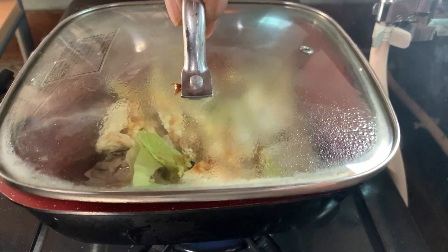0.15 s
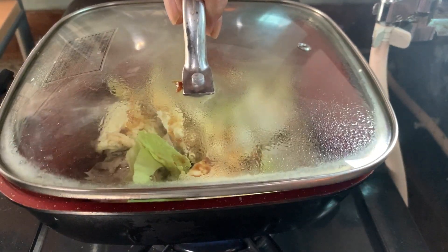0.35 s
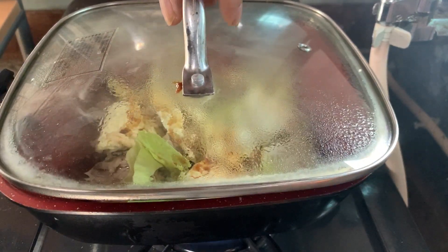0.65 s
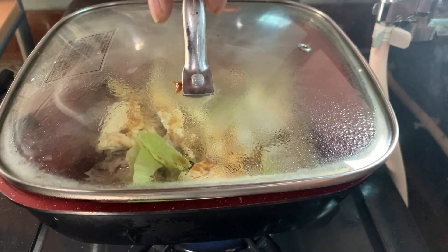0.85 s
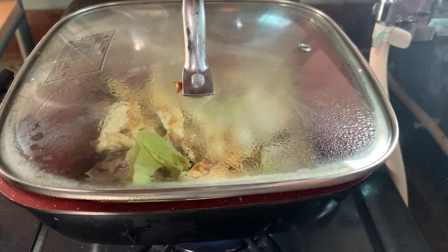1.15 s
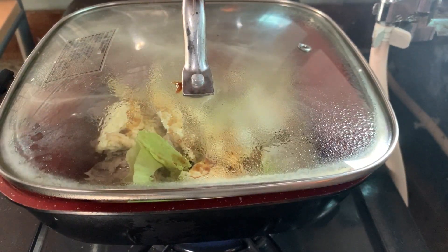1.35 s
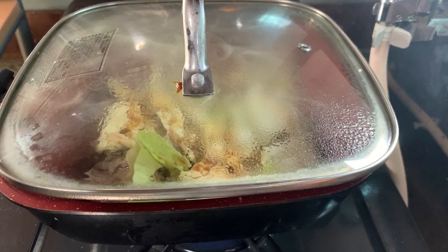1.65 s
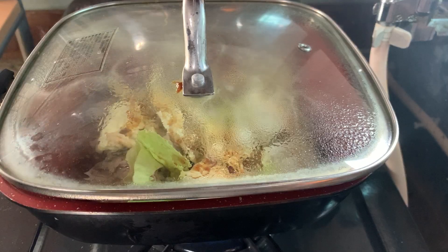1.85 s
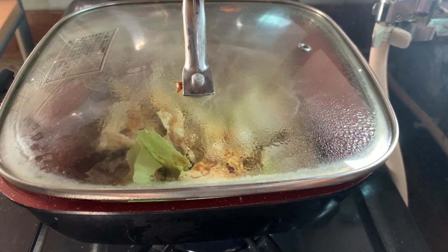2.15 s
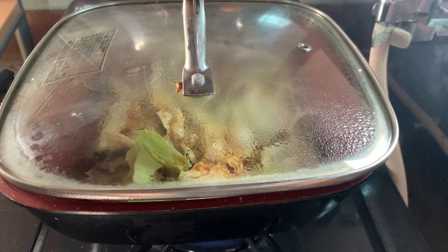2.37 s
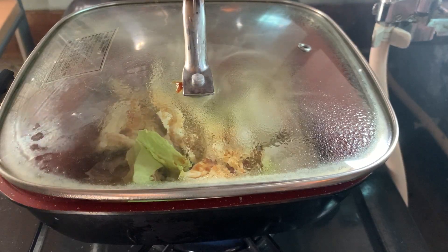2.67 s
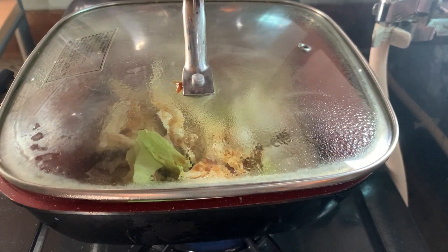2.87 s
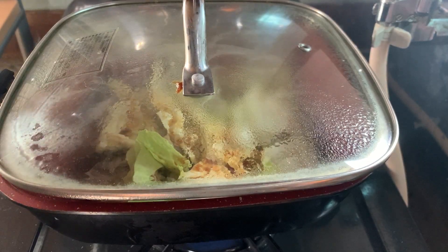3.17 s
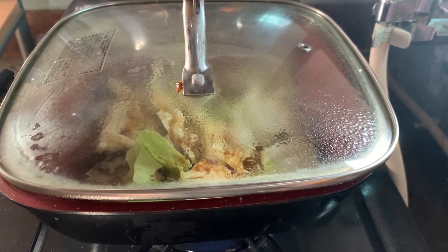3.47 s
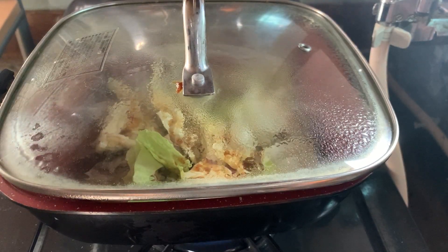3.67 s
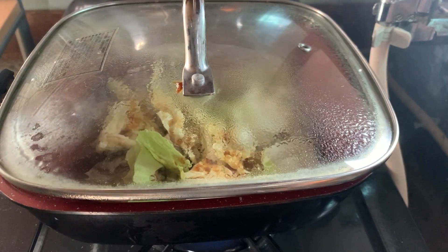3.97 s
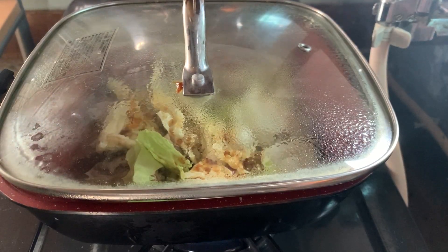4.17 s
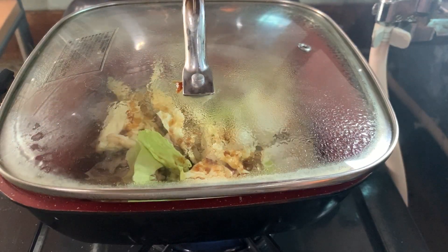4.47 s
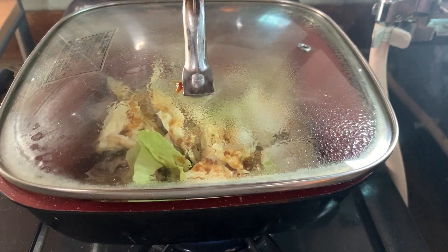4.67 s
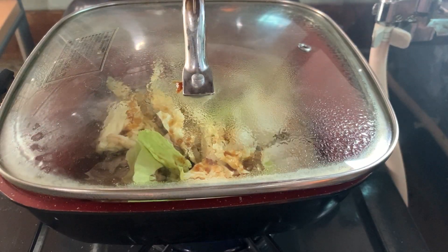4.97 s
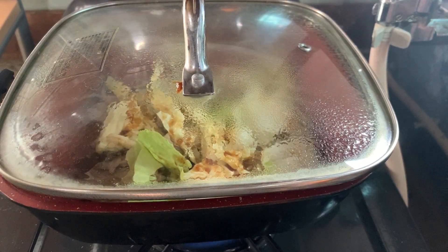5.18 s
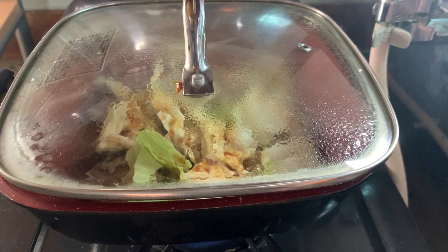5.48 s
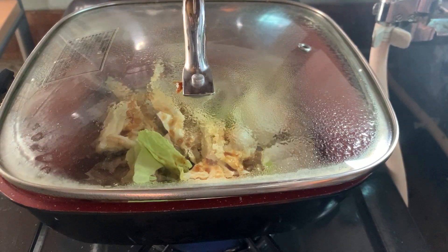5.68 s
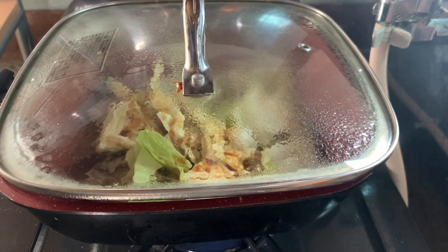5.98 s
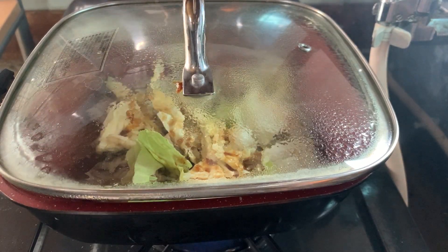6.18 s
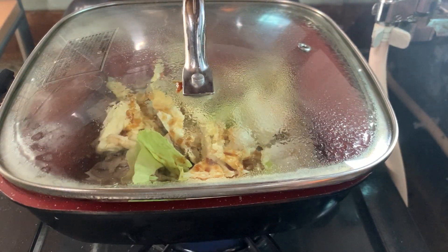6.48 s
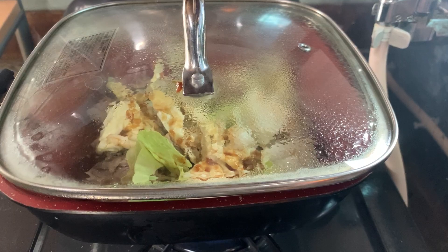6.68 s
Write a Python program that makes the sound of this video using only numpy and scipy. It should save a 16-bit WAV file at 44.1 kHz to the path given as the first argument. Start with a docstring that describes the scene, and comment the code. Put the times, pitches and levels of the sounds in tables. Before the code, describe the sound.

Vegetables and meat simmer beneath a lid while fat crackles continuously at the rim, crisp and treble-heavy, nearer the left of a close two-port microphone. Muffled puffs and thuds open the scene, occasional bubbles glug softly, and the gas roars faintly. Late on, the lid clacks once with a short metallic ring and chatter in the small kitchen, with faint deep rumble around it.

```python
"""Fat fizzes and spits at the rim of a pan under a glass lid, on a gas ring in a small kitchen; a hand nudges
the lid. The fizz is random clicks, short rings and sprays of noise, its treble reaching the left-hand near port
first. Vegetables and meat simmer below: bubbles drive the resonances of the air under the lid, and big ones
glug. The flame is low, flickering noise; a deep rumble swells later, and one hard clack rings and ends in a
light rattle. The microphone has two ports, the left one nearer to the rim."""
import sys
import numpy as np
from scipy import signal
from scipy.fft import rfft, irfft, next_fast_len
from scipy.io import wavfile
from scipy.ndimage import map_coordinates

SR = 44100
rng = np.random.default_rng(int(sys.argv[2]) if len(sys.argv) > 2 else 0)


def materialize(psi):
    """Save the field psi as 16-bit PCM at rate SR to the path in sys.argv[1].

    A 1-D psi becomes a single channel; in a 2-D psi each row is a channel.
    """
    bounded = np.clip(np.atleast_2d(psi).T, -1, 1)
    quanta = np.round(bounded * 32767).astype(np.int16)
    wavfile.write(sys.argv[1], SR, quanta)


N = 301203
TIME = np.arange(N) / SR
KITCHEN_T60_S = 0.47

# sizes of steam bursts in the fat, large to tiny: centre f/Hz, bursts/(1/s), spread of strength/dB
BURST_SIZES = [(2900, 3100, -1), (7100, 5000, 3), (9400, 9000, 4), (12920, 11000, 3)]


def from_db(db):
    """Decibels to gain."""
    return 10 ** (np.asarray(db) / 20)


def at_hz(points, hz):
    """Levels in dB read from a table of (f/Hz, dB) points at the given frequencies, interpolated on a log-
    frequency scale; beyond the ends the end values hold."""
    points = np.array(points)
    return np.interp(np.log(hz + 1e-3), np.log(points[:, 0]), points[:, 1])


def panned(db):
    """Left and right gains for a level difference; positive is louder on the left."""
    return from_db(np.array([[db], [-db]]) / 2)


def shaped(x, response):
    """Filter by a response given as a function of Hz; unit white noise comes out at that level per Hz."""
    size = next_fast_len(N + SR // 10)
    hz = np.arange(size // 2 + 1) * SR / size
    filtered = irfft(rfft(x, size) * response(hz), size)
    return filtered[..., :N] * np.sqrt(SR / 2)


def drift(rate):
    """A random line through this many knots per second, with a spread of about 1."""
    knots = rng.standard_normal(4096)
    line = map_coordinates(knots, [TIME * rate], order=1, mode="wrap")
    return line * np.sqrt(3 / 2)  # straight lines between knots lose a third of the power


def pair(mid, side, likeness):
    """Two channels of a given likeness from two unrelated signals."""
    likeness = np.clip(likeness, -1, 1)
    common = np.sqrt((1 + likeness) / 2) * mid
    opposed = np.sqrt((1 - likeness) / 2) * side * np.array([[1], [-1]])
    return common + opposed


def bursts(per_s, spread_db):
    """Bubbles burst at random moments with random strength and polarity; rms 1."""
    sizes = from_db(spread_db * np.minimum(rng.exponential(1, N), 6))
    happens = rng.random(N) < per_s / SR
    clicks = happens * sizes * rng.choice([-1, 1], N)
    return clicks / np.std(clicks)


def scattered(x, t60):
    """Dense reflections that die away, different at each port; power is kept."""
    t = TIME[:SR // 2]
    echoes = rng.standard_normal((2, len(t))) * from_db(-60 * t / t60) * (t > .001)
    echoes /= np.sqrt(np.sum(echoes ** 2, axis=1, keepdims=True))
    return signal.fftconvolve(x[None], echoes, axes=1)[:, :N]


def strikes(times, levels_db):
    """One click at each moment."""
    clicks = np.zeros(N)
    samples = np.clip(np.round(times * SR).astype(int), 0, N - 1)
    clicks[samples] = from_db(levels_db)
    return clicks


def spits():
    """Moments, levels and brightest pitches of all spits: the loud ones and a random scatter of weaker ones."""
    # the loudest spits of fat: t/s, relative level/dB, brightest f/Hz
    loud_spits = [(0.0125, -1, 3500), (0.0305, 1.5, 7000), (0.1637, -1.5, 8000), (0.3162, 2.5, 10000),
                  (0.678, -1.5, 10000), (1.1082, -4, 9500), (1.1235, 1.5, 9500), (1.8373, .5, 12500),
                  (2.5966, -2.5, 11500), (2.618, -3, 12500), (2.935, 1.5, 8500), (3.023, -3, 13500),
                  (3.083, -2, 7500), (3.464, -2.5, 9500), (3.5581, 0, 6000), (3.7262, 1.5, 13500),
                  (3.9392, 3.5, 9500), (4.3186, -2.5, 11500), (4.8698, -2.5, 10000), (4.994, -2.5, 11000),
                  (5.2335, -2.5, 11500), (5.858, -1.5, 5500), (5.949, -.5, 8000), (6.026, -2, 13000),
                  (6.443, -1.5, 9500), (6.669, -.5, 9800)]
    per_s, middle_db, spread_db = 9.0, -9.5, 2.5   # the weaker ones; the spread goes both ways
    chance = rng.random((90, 3))
    gaps = -np.log(1 - chance[:, 0]) / per_s
    times = np.cumsum(gaps)
    levels = middle_db + spread_db * (2 * chance[:, 1] - 1)
    lowest_hz, highest_hz = BURST_SIZES[0][0], BURST_SIZES[-1][0]
    pitches = lowest_hz * (highest_hz / lowest_hz) ** chance[:, 2]
    weak_spits = np.column_stack([times, levels, pitches])[times < TIME[-1]]
    return np.vstack([loud_spits, weak_spits]).T


def pings(count=4800):
    """Tiny bubbles in the fat ring for a moment as they burst, each at a pitch of its own."""
    base_db, spread_db, t60_s = -12, 2.2, 0.014
    out, t = np.zeros(N + SR), TIME[:SR // 60]
    chance = rng.random((count, 3))
    starts = (chance[:, :1] * N).astype(int)
    lowest_hz, highest_hz = BURST_SIZES[0][0], BURST_SIZES[-1][0]
    hz = lowest_hz + (highest_hz - lowest_hz) * chance[:, 1:2]
    db = base_db + spread_db * np.minimum(-np.log(1 - chance[:, 2:]), 4)
    notes = from_db(db - 60 * t / t60_s) * np.sin(2 * np.pi * hz * t)
    np.add.at(out, starts + np.arange(len(t)), notes)
    return out[:N]


def sizzle(fizz_db, spit_db=27.7, flutter_db=0.85, flare_db=1.2, flare_s=0.016,
           surge_db=0.33, wander_db=0.55, linger_s=0.0022):
    """Steam bursts in the fat come in flurries; their treble beams out of the rim gap, the rest bounces around."""
    # colour of the fizz: f/Hz, relative level per Hz/dB
    fizz_colour = [(2800, -71), (4400, -71.7), (5100, -73.3), (6300, -74), (6950, -72.5), (7200, -68),
                   (7420, -68.7), (7650, -73), (8400, -72), (8850, -67.8), (9200, -69.7), (10600, -65.3),
                   (11500, -68.5), (12300, -66.2), (13000, -69.3), (13700, -68), (15600, -70.2)]
    # share of the fizz that arrives straight from the rim: f/Hz, share (0-1)
    direct_share = [(2800, .04), (4500, .2), (6500, .55), (8200, .66), (9100, .97), (10200, .97),
                    (11200, .8), (13000, .92), (15500, .62)]
    port_lag_s = .000154   # the rim is nearer to the left microphone port
    spit_spray_s, spit_width_octaves = 0.001, 1.15   # a spit is half as strong this far from its brightest pitch
    times, levels, pitches = spits()
    # juice that hits the hot metal spits, then fizzes harder for a moment
    flare = signal.fftconvolve(strikes(times, levels), np.exp(-TIME[:SR // 4] / flare_s))[:N]
    swells_db = .38 * drift(20)
    heat = from_db(fizz_db + swells_db + surge_db * drift(9) + flare_db * flare)
    centres = [row[0] for row in BURST_SIZES]
    keep = np.exp(-1 / (linger_s * SR))
    share = lambda hz: np.clip(at_hz(direct_share, hz), 0, 1)
    ports = lambda hz: np.exp(-2j * np.pi * hz * np.array([[0], [port_lag_s]]))
    out = shaped(pings() * heat, lambda hz: from_db(at_hz(fizz_colour, hz)) * ports(hz))
    # a spit is a short spray of droplets
    spray = np.exp(-TIME[:SR // 50] / spit_spray_s)
    spray = spray / np.linalg.norm(spray)
    for own, (centre_hz, per_s, spread_db) in zip(np.eye(len(BURST_SIZES)), BURST_SIZES):
        # each size fills the range around its centre
        band = lambda hz: np.sqrt(at_hz(list(zip(centres, own)), hz))
        low_cut = lambda hz: hz / np.hypot(hz, 750.0)
        colour = lambda hz: band(hz) * from_db(at_hz(fizz_colour, hz)) * low_cut(hz)
        flurries = from_db(flutter_db * drift(90) + wander_db * drift(13))
        clicks = bursts(per_s, spread_db) * heat * flurries
        # each spit is strongest near its own pitch
        away = np.log2(centre_hz / pitches) / spit_width_octaves
        hits = strikes(times, levels + spit_db - 20 * np.log10(1 + away ** 2))
        clicks = clicks + signal.oaconvolve(hits, spray)[:N] * rng.standard_normal(N)
        # every burst leaves a brief wash of reflections, different at each port
        wash_level = np.sqrt(signal.lfilter([1 - keep], [1, -keep], clicks ** 2))
        wash = wash_level * rng.standard_normal((2, N))
        out = out + shaped(clicks, lambda hz: colour(hz) * np.sqrt(share(hz)) * ports(hz))
        out = out + shaped(wash, lambda hz: colour(hz) * np.sqrt(1 - share(hz)))
    return out


def simmer(simmer_db, lumps_db=1.5):
    """Bubbling juice sounds the air modes under the lid; steam speeds up sound and their pitches rise."""
    # air modes under the lid, as they stand halfway through: f/Hz, width/Hz, relative level per Hz/dB,
    # left-right difference/dB, left-right likeness (0-1),
    # pitch rise from start to end (fraction), level rise from start to end/dB
    cavity_modes = [(247.7, 28.4, -57.5, 0, 0.98, 0.0076, -6), (301.8, 33.6, -58.5, -1, 1, 0.000092, -10),
                    (351.8, 45.6, -53.5, -0.5, 0.92, 0.057, 0),
                    (405.3, 62.5, -56, -1.5, 0.93, 0.061, -10.5),
                    (578.5, 27.6, -63.5, -2, 0.58, 0.021, -3.5), (983, 143, -66.5, -6.5, 0.37, 0.06, -3),
                    (1091, 112, -59, -2, 0.55, 0.042, -4.5), (1223, 85, -65, -2.5, 1, 0.00057, -1),
                    (1447, 112, -69, 3, 1, 0.049, -8), (1542, 71, -65, 0.5, 1, 0.034, -5.5),
                    (1802, 70, -62.5, -4.5, 0.44, 0.024, -6), (1960, 170, -67.5, 2, 0.93, 0.042, -6.5),
                    (2200, 56, -65, -4, 0.49, 0.025, -8.5), (2344, 125, -71, 3, 0.44, 0.057, -10),
                    (2866, 420, -74.5, 1, 0.38, 0.02, -2), (3570, 72, -73, 6, 1, 0.038, -1),
                    (4100, 540, -76, 8, 1, 0.037, -5.5), (5700, 760, -85.5, 24.5, 0.16, 0.034, -4),
                    (6910, 240, -72, -5, 0.33, 0.044, -7)]
    out, steam = 0, TIME / TIME[-1] - .5
    bubbles = bursts(per_s=1300, spread_db=2.0), bursts(per_s=1300, spread_db=2.0)
    diffuse = rng.standard_normal((2, N))
    for k, (hz, width, level_db, pan_db, likeness, rise, grow_db) in enumerate(cavity_modes):
        # shift the drive down to 0 Hz, filter it there, and shift it back up to the moving pitch
        turn = np.exp(2j * np.pi * np.cumsum(hz * (1 + rise * steam)) / SR)
        drive = pair(bubbles[k % 2], diffuse[k % 2], likeness) * from_db(lumps_db * drift(8.7))
        lowpass = signal.butter(2, width / 2, fs=SR, output="sos")
        swell = signal.sosfilt(lowpass, drive / turn)
        out = out + 2 * (swell * turn).real * from_db(level_db + grow_db * steam) * panned(pan_db)
    return out * np.sqrt(SR / 2) * from_db(simmer_db)


def flame(flicker_db=2.0):
    """Gas flame and kitchen rumble: a low, flickering roar of filtered noise, nearly alike at both ports."""
    # colour of the roar before it flickers: f/Hz, level per Hz/dB
    flame_colour = [(15, -92), (32, -84), (56, -68.5), (110, -67), (145, -73.5), (200, -73), (480, -70),
                    (700, -78), (3000, -110)]
    noise = pair(*rng.standard_normal((2, N)), likeness=0.97)
    return shaped(noise, lambda hz: from_db(at_hz(flame_colour, hz))) * from_db(flicker_db * drift(5.6))


def bump(start, level_db, hz, swell):
    """A soft, hollow note that swells to its peak and dies."""
    age = np.clip(TIME - start, 0, 20 * swell)
    envelope = (age / swell * np.exp(1 - age / swell)) ** 3
    return from_db(level_db) * envelope * np.sin(2 * np.pi * hz * age)


def thud(start, level_db):
    """The pan shakes on its support, at several pitches together."""
    # what the pan thuds with: f/Hz, relative level/dB, time to the peak/s
    pan_modes = [(71.5, -3.5, 0.017), (161, -2.5, 0.01), (239.6, -6, 0.015), (606, -13, 0.0074)]
    return sum(bump(start, level_db + db, hz, swell) for hz, db, swell in pan_modes)


def bumps(room_db=-13.0, boom_db=-8.0):
    """Nudges of the hand and further hollow notes pump the air under the lid and make the pan thud; the kitchen
    answers."""
    # the hand nudges the lid: t/s, level of the puff of air/dB, puff f/Hz, level of the pan's thud/dB
    nudges = [(0.0194, -7, 402, -32), (0.0629, -12.5, 340, -17.5), (0.1002, -18, 370, -19.5),
              (0.277, -22.5, 420, -40), (0.306, -22, 333, -35), (0.3417, -13, 371, -37),
              (0.385, -25, 285, -38)]
    # short hollow notes of the air under the lid, some from big bubbles: t/s, level/dB, f/Hz
    hollow_notes = [(0.994, -26, 351), (1.255, -25, 349), (1.398, -26, 361), (1.447, -26, 351), (3.11, -29.5, 563),
                    (3.672, -33, 560), (3.716, -33, 630), (3.767, -21.5, 370), (4.559, -24.5, 360),
                    (5.523, -22, 372), (6.119, -25, 374), (6.674, -23, 378), (6.742, -25, 355)]
    puff_swell_s, note_swell_s = 0.0074, 0.0063   # time from the start of a bump to its peak
    note_thud_db = -19   # each hollow note shakes the pan this far below its own level
    boom_t60_s = 0.54   # the bass lingers longer in the kitchen
    puffs = sum(bump(s, db, hz, puff_swell_s) for s, db, hz, _ in nudges)
    puffs = puffs + sum(bump(s, db, hz, note_swell_s) for s, db, hz in hollow_notes)
    thuds = sum(thud(s, db) for s, _, _, db in nudges)
    thuds = thuds + sum(thud(s, db + note_thud_db) for s, db, _ in hollow_notes)
    # the boom is alike at both ports
    boom = from_db(boom_db) * scattered(thuds, boom_t60_s)[0]
    return puffs + thuds + boom + from_db(room_db) * scattered(puffs, KITCHEN_T60_S)


def rumble():
    """A faint, deep rumble of narrow-band noise that swells, holds and dies away."""
    # swells of the rumble: t/s, length/s, level/dB, centre f/Hz, width/Hz
    rumble_swells = [(4.27, 0.12, -46, 46, 20), (5.778, 0.72, -52.5, 37.5, 6.3), (6.4, 0.5, -48, 41, 12)]
    attack_s, release_s = 0.06, 0.14
    out = 0
    for start, length, level_db, hz, width in rumble_swells:
        band = signal.butter(2, [hz - width / 2, hz + width / 2], "band", fs=SR, output="sos")
        noise = signal.sosfilt(band, pair(*rng.standard_normal((2, N)), likeness=0.93))
        attack = np.clip((TIME - start) / attack_s, 0, 1)
        release = np.exp(-np.maximum(TIME - start - length, 0) / release_s)
        out = out + noise / np.std(noise) * from_db(level_db) * attack * release
    return out


def clack(crack_t60=0.04, room_db=0.0, ring_room_db=-16.0, ring_floor_hz=230.0):
    """A few quick contacts, each a dull crack and a short ring, answered by the kitchen."""
    # three hard contacts and a light one as the lid settles: t/s, relative ring level/dB, relative crack level/dB
    contacts = [(5.1188, -10.5, 2), (5.125, -1.5, -2), (5.1349, -11.5, -6.5), (5.158, -32, -10)]
    # what the clack rings with: f/Hz, relative level/dB, t60/s, left-right difference/dB
    ring_modes = [(167, -29, 0.43, 2), (237, -44, .2, 6), (311.6, -17, 0.19, 1), (392, -37, .15, -3),
                  (429, -11.5, 0.12, -5), (474, -13.5, 0.11, -6), (552, -20, 0.1, -7), (594, -20, 0.21, -4),
                  (652, -19.5, 0.21, 0), (860, -27.5, 0.25, -4), (953, -17, 0.076, 0), (1052, -29, .17, 1),
                  (1170, -37, .14, 2), (1305, -29, 0.21, -8), (1500, -31, .4, 8), (1540, -30, 0.45, -11),
                  (1610, -28, 0.25, -7), (1790, -25, 0.1, 4), (2100, -33, .45, 3),
                  (2205, -24.5, 0.26, -7.5), (2260, -37, .4, -4), (2600, -29, 0.23, -10),
                  (3140, -35, 0.2, -2)]
    # colour of each crack: f/Hz, relative level per Hz/dB
    crack_colour = [(150, -86), (350, -42), (650, -44), (900, -53), (2200, -57), (3000, -61.5),
                    (4800, -63.5), (8000, -92), (15000, -95)]
    lag_s = .00025   # the ring reaches the left port first
    times, ring_db, crack_db = np.transpose(contacts)
    t = TIME[:SR // 2]
    # the ring carries no deep bass
    bass_cut = signal.butter(3, ring_floor_hz, "high", fs=SR, output="sos")
    blows = signal.sosfilt(bass_cut, strikes(times, ring_db))
    body = sum(from_db(db - 60 * t / t60) * np.sin(2 * np.pi * hz * t) * panned(pan)
               for hz, db, t60, pan in ring_modes)
    ring = signal.fftconvolve(blows[None], body, axes=1)[:, :N]
    direct = np.array([ring[0], np.interp(TIME - lag_s, TIME, ring[1])])
    ring_room = from_db(ring_room_db) * scattered(ring.mean(0), KITCHEN_T60_S)
    fade = signal.fftconvolve(strikes(times, crack_db), from_db(-60 * t / crack_t60))[:N]
    grit = pair(*rng.standard_normal((2, N)), likeness=0.13) * fade
    grit_room = from_db(room_db) * scattered(grit[0], KITCHEN_T60_S)
    crack = shaped(grit + grit_room, lambda hz: from_db(at_hz(crack_colour, hz)))
    return direct + ring_room + crack * panned(-1.1)


def rattle():
    """The rim chatters lightly as the lid settles: thin, gritty ticks of noise without the thump of the pan."""
    # light touches of the rim: t/s, level per Hz/dB
    touches = [(5.183, -58.5), (5.223, -60), (5.240, -62)]
    low_hz, high_hz, t60_s = 1440, 2430, 0.12
    decay = from_db(-60 * TIME[:SR // 2] / t60_s)
    fade = signal.fftconvolve(strikes(*np.transpose(touches)), decay)[:N]
    band = signal.butter(3, [low_hz, high_hz], "band", fs=SR, output="sos")
    return signal.sosfilt(band, rng.standard_normal((2, N)) * fade) * np.sqrt(SR / 2)


def scene():
    """The pan, its lid and the flame together."""
    # juice gathers under the lid and from 3.16 s the fizz slowly weakens, by 0.5 dB per s
    fizz_db = -1.2 - 0.5 * np.maximum(TIME - 3.16, 0)
    # the juice boils a little harder as the lid traps the heat, by 0.5 dB per s
    simmer_db = 0.01 + 0.5 * (TIME - TIME.mean())
    return sizzle(fizz_db) + simmer(simmer_db) + flame() + bumps() + rumble() + clack() + rattle()


def record(dry):
    """Full scale bounds the peaks, then a steep low-pass cuts the top."""
    cutoff_hz = 15720
    top_cut = signal.ellip(12, .1, 90, cutoff_hz, fs=SR, output="sos")
    return signal.sosfilt(top_cut, np.clip(dry, -1, 1))


dry = scene()
out = record(dry)
materialize(out)
```